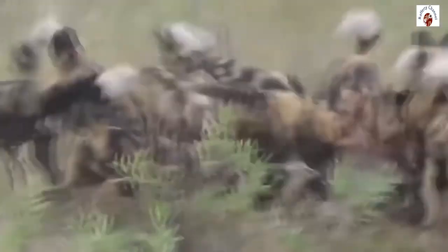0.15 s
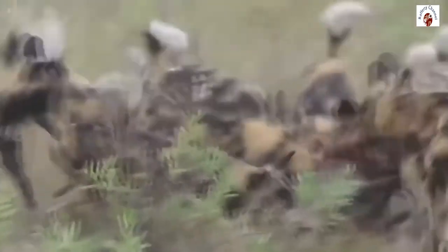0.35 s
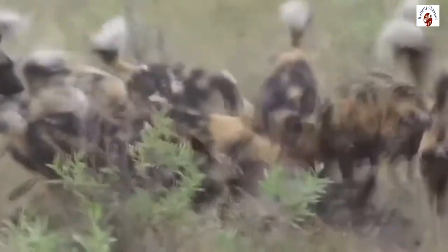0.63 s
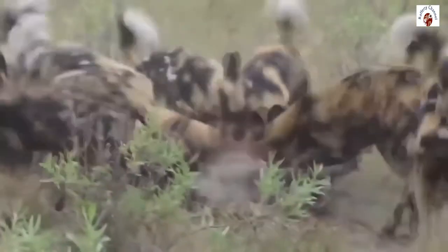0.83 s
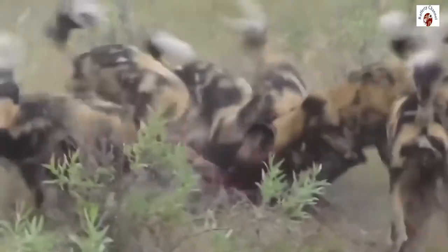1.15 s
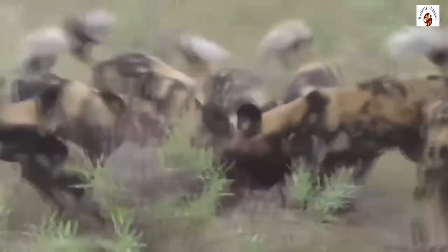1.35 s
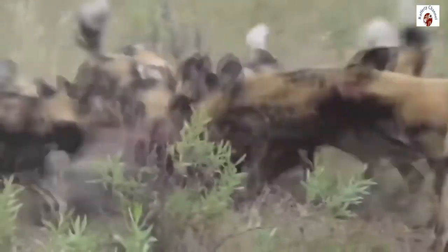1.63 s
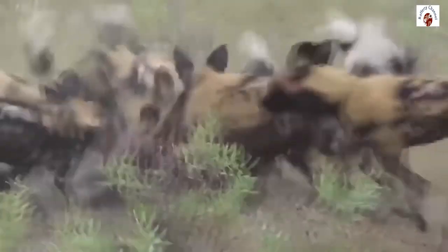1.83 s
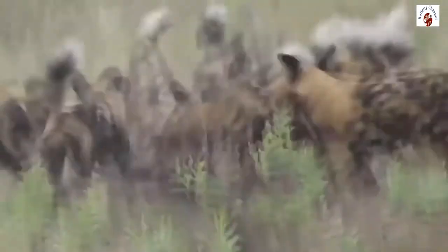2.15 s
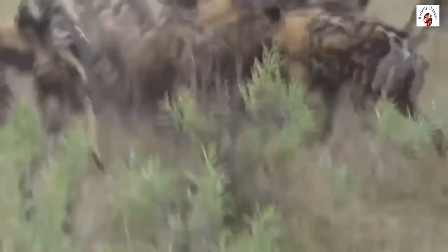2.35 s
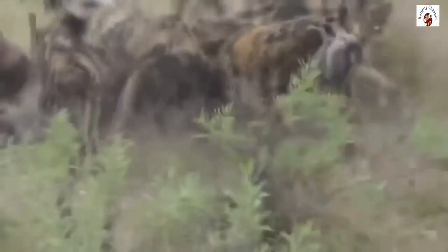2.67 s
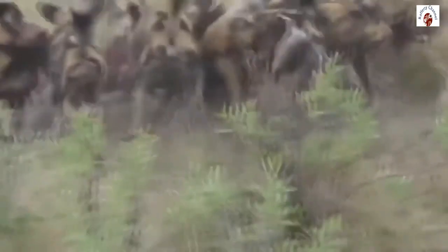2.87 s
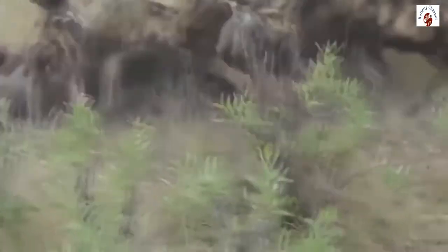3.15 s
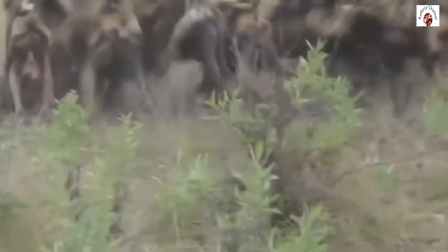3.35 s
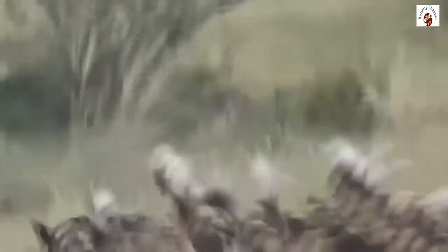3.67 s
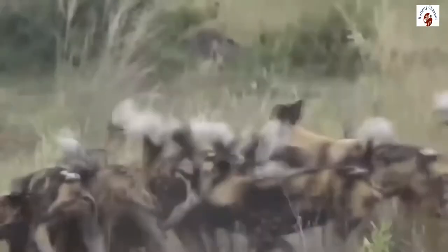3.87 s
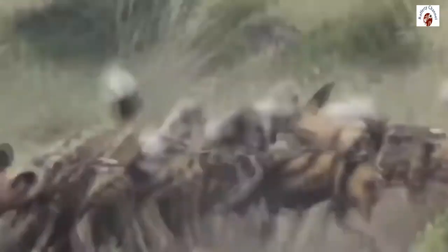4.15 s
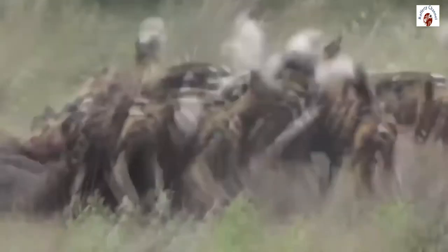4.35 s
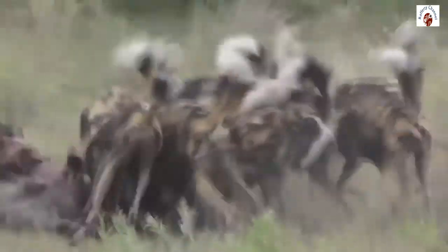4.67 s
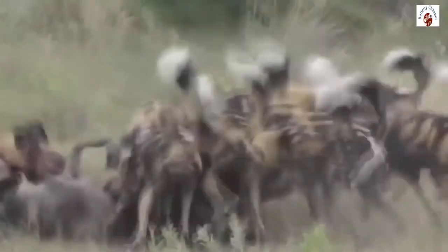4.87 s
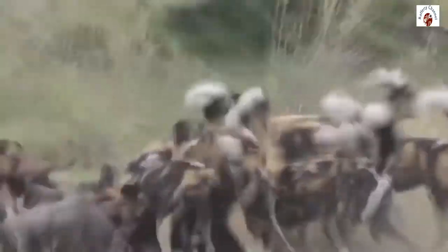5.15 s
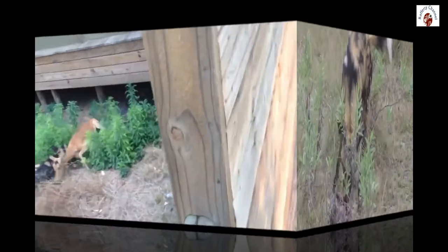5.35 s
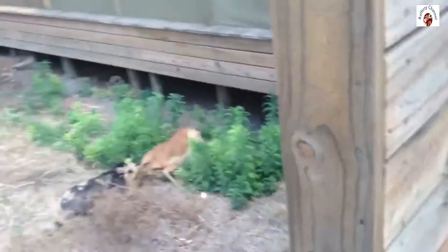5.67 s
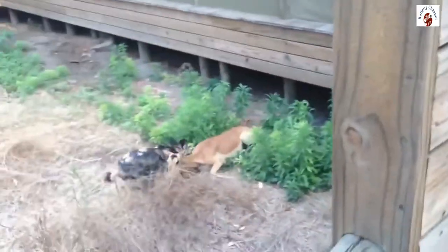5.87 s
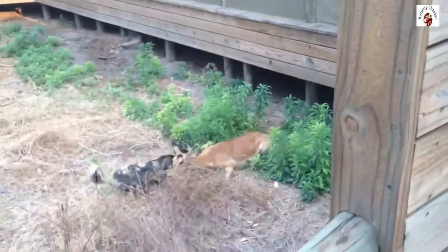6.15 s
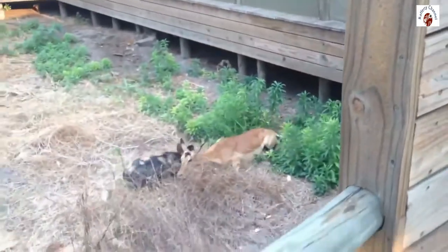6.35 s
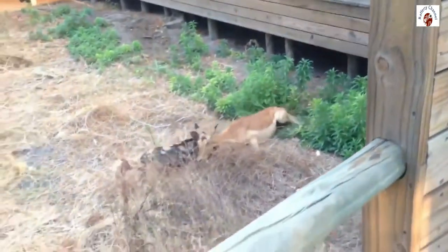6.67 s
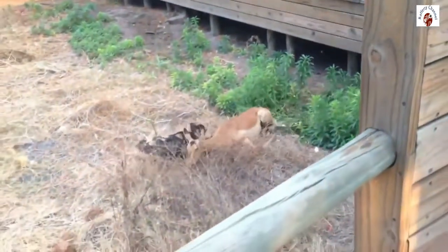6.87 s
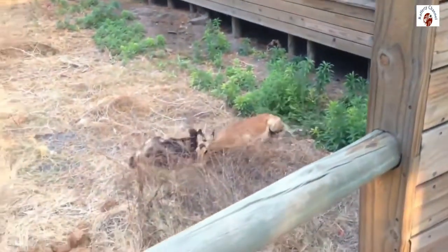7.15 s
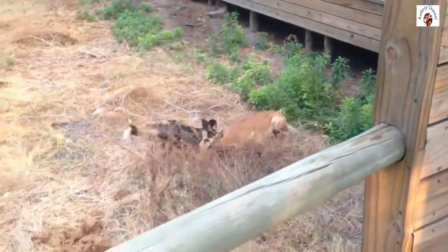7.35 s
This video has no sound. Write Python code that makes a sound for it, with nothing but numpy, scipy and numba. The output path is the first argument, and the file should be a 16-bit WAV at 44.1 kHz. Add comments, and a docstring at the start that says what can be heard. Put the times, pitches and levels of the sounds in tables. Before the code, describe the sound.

A distant, faint outdoor scene opens with shrill insect hiss, rumbling air at the microphone, a piping bird, then thin gliding dog squeaks and one weak whine. Suddenly the sound becomes near, loud and centred: rough, throaty antelope cries with a slight hollow wall reflection, while struggling legs crunch dry stalks with sharp snaps and soft thuds. The last cry is cut short at its start.

```python
"""Grassland: a pack of wild dogs twitters faintly under a cicada, a bird repeating one whistle and wind on two ports.
Dogs and bird are gliding near-sines, a faint whine is noise through a mouth, the cicada is a set of steady lines.
Then the scene changes to a closer, mono one beside a wooden wall: a seized antelope bellows hoarsely, made of
uneven pulses ringing a throat, while legs thrash through dry grass, made of noise, snaps and dull thuds."""
import sys
import numpy as np
from scipy import signal
from scipy.fft import rfft, irfft, next_fast_len
from scipy.io import wavfile
from scipy.ndimage import uniform_filter1d
from numba import njit

SR = 44100
rng = np.random.default_rng(int(sys.argv[2]) if len(sys.argv) > 2 else 0)


def unload_audio(sound):
    """Save the sound as a 16-bit wav file, at the path given as the first command line argument."""
    columns = np.transpose(np.atleast_2d(sound))
    # keep every value between -1 and 1, then stretch to whole-number steps
    steps = np.round(np.clip(columns, -1, 1) * 32767)
    wavfile.write(sys.argv[1], SR, steps.astype(np.int16))


N = 331191
T = np.arange(N) / SR
CHANGE_S = 5.303  # when the closer scene begins

# sudden pushes of air in the bellows, each starting a pair of closures: (time [s], push [dB])
SURGE_ROWS = [(5.449, 10), (5.472, 6), (5.514, 3), (5.538, 2), (5.573, 3), (5.656, 6), (5.679, 3.5),
              (5.7, 1), (5.72, 1), (5.756, 7), (6.424, 6), (6.644, 9), (6.677, 4), (6.746, 6), (6.76, 2),
              (6.797, 3), (6.821, 4), (6.847, 3), (6.881, 5), (7.494, 2)]


def undb(db):
    """Turn decibels into a plain factor."""
    return 10 ** (np.asarray(db) / 20)


def unit(x):
    """Scale to an rms of 1."""
    return x / np.sqrt(np.mean(x ** 2))


def curve(rows, column, outside=None):
    """Draw one column of a table along the whole time axis."""
    rows = np.array(rows)
    return np.interp(T, rows[:, 0], rows[:, column], outside, outside)


def walk(rate):
    """Random levels, held for 1 / rate seconds and smoothed twice; spread near 1."""
    hold = int(SR / rate)
    steps = np.repeat(rng.standard_normal(N // hold + 1), hold)
    return unit(uniform_filter1d(uniform_filter1d(steps, hold), hold)[:N])


@njit
def svf(x, hz, width):
    """State-variable band-pass filter with a moving centre, where its gain is 1."""
    y, b, l = np.empty(len(x)), 0., 0.
    for i in range(len(x)):
        g, k = np.tan(np.pi * hz[i] / SR), width / hz[i]
        v = (b + g * (x[i] + 1e-18 - l)) / (1 + g * (g + k))
        b, l, y[i] = 2 * v - b, l + 2 * g * v, k * v
    return y


def band(x, hz, width):
    """The same band-pass, for a fixed or moving centre."""
    return svf(x, hz * np.ones(len(x)), float(width))


def band_twice(x, hz, width):
    """Two equal band-passes in a row, for steeper sides."""
    return band(band(x, hz, width), hz, width)


def coloured(points, x):
    """Shape the spectrum of x by (frequency [Hz], level [dB]) points, then scale to rms 1."""
    hz, db = np.transpose(points)
    f = np.arange(1, N // 2 + 2) * SR / N
    return unit(irfft(rfft(x) * undb(np.interp(np.log(f), np.log(hz), db)), N))


def air():
    """Distant rustle of the plain, wind buffeting the ports, and slow pressure pushes that both ports share."""
    # colour of the rustle: (frequency [Hz], relative level [dB per Hz])
    field_colour = [(20, -8), (120, -25), (250, -25), (500, -28.5), (1000, -34.5), (2500, -42), (5600, -46),
                    (6500, -40), (8500, -39), (9300, -40.5), (10500, -48.5), (12300, -58), (13000, -75),
                    (16000, -85)]
    # gusts and lulls: (time [s], change of wind level [dB], fading time [s])
    gust_rows = [(.0, 4, .04), (.12, -5, 0.066), (1.95, 9.5, 0.15), (2.88, 2, 0.14), (3.4, 4.5, 0.06),
                 (3.95, 5.5, 0.096), (4.21, 7, 0.095), (4.5, 5, 0.044), (4.82, 9, 0.12)]
    # pushes: (time [s], peak before the leak [dB], length scale [s])
    push_rows = [(0.057, -42.5, 0.037), (0.616, -45, 0.036), (1.192, -43.5, 0.06), (1.718, -48, 0.022),
                 (2.294, -43.5, 0.031), (2.843, -46, 0.032), (3.4, -44.5, 0.033), (3.975, -43, 0.051),
                 (4.544, -41.5, 0.056), (4.878, -47, 0.067), (5.086, -40.5, 0.04)]
    field_db, wind_db = -62, -65
    field = np.array([coloured(field_colour, rng.standard_normal(N)) * undb(field_db + 1.16 * walk(23.17))
                      for _ in range(2)])

    coarse = T[::16]  # slow shapes need fewer points
    gusts = 0
    for s, db, fade in gust_rows:
        hurry = np.where(coarse > s, 1, 3.0)  # rises three times as fast as it fades
        gusts = gusts + db * np.exp(-hurry * np.abs(coarse - s) / fade)
    gusts = np.interp(T, coarse, gusts)
    shared, left, right = (unit(band_twice(rng.standard_normal(N), 69, 100)) for _ in range(3))
    wind = (0.67 * shared + 0.7 * np.array([left, right])) * undb(wind_db + gusts + 2.0 * walk(25.25))

    pushes = sum(undb(db) * np.exp(-np.abs((coarse - s) / (0.66 * length)) ** 5.4)
                 for s, db, length in push_rows)
    pushes = np.interp(T, coarse, pushes)
    slack = signal.lfilter([1 / 9000], [1, 1 / 9000 - 1], pushes)  # the ports leak, so pressure settles back
    return field + wind + pushes - slack


def verse(t, first, clicks, strokes, second, level, size=32):
    """Click partials with side lines a stroke rate apart; each line flutters alone, differently at each port."""
    # side lines of a click partial, from one below it upwards: (level against the partial [dB])
    stroke_side = (-9, 0, -7, -1, -6, -13)
    # lines of the second insect, from three below its named line: (level against its table level [dB])
    second_side = (-6.5, -9, -12, -2, -18)
    rasp_db, rasp_hz = -13, 200  # level against the partials, and width
    lines = [(first + n * clicks + j * strokes, db + side)
             for n, db in enumerate(level[:-1]) for j, side in enumerate(stroke_side, -1)]
    lines += [(second + j * strokes, level[-1] + side) for j, side in enumerate(second_side, -3)]
    hz, db = np.transpose(lines)[:, :, None]

    # flutter: new random level and phase about 14 times a second, one value per block of samples
    count = int((t[-1] - t[0]) * 14) + 2
    chance = rng.standard_normal((2, 2, len(lines), count))
    at = np.linspace(0, count - 1, len(t) // size)
    swell, turn = np.apply_along_axis(lambda k: np.interp(at, np.arange(count), k), -1, chance)
    gain = np.sqrt(2) * undb(db + 3 * swell)
    late = 2 * np.pi * (.12 * turn + rng.random((2, len(lines), 1)))
    phase = (2 * np.pi * (hz * t[:len(at) * size] % 1)).astype(np.float32).reshape(len(lines), -1, size)
    # sum of gain * sin(phase + late), by the sine addition rule; p = port, l = line, b = block, s = sample
    song = sum(np.einsum("plb,lbs->pbs", (gain * a(late)).astype(np.float32), b(phase))
               for a, b in ((np.cos, np.sin), (np.sin, np.cos)))
    song = np.pad(song.reshape(2, -1), ((0, 0), (0, len(t) % size)))

    # unsteady clicks spread a hiss around each partial
    n = next_fast_len(len(t), True)
    f = np.arange(n // 2 + 1) * SR / n
    comb = 0
    for k, partial_db in enumerate(level[:-1]):
        centre = first + k * clicks + 0.77 * strokes
        comb = comb + undb(partial_db) / (1 + ((f - centre) / (rasp_hz / 2)) ** 4)
    rasp = irfft(rfft(rng.standard_normal((2, n))) * comb, n)[:, :len(t)] * np.sqrt(2 * SR / np.pi / rasp_hz)
    return song + undb(rasp_db) * rasp


def cicada():
    """Verses blend into each other and waver a little in pitch; faint overtones flicker above."""
    # verses: (start [s], end [s], blend [s], lowest click partial [Hz], clicks [per s], strokes [per s],
    # line of a second insect [Hz])
    verse_rows = [(0, 1.9, .8, 6327, 354.3, 48.5, 6190), (1.1, 4.51, .8, 6340, 355.2, 50.5, 6185),
                  (4.505, 5.1, .005, 6408, 357, 51, 6206), (4.95, 5.4, .15, 6408, 357, 51, 6206)]
    # per verse, before flutter and port balance: (eight click partials [dB rms], second insect [dB])
    verse_levels = [(-100, -78, -84, -73, -78.5, -72, -86, -83, -78.5),
                    (-100, -76, -78.5, -75.5, -76, -74, -80, -80.5, -80),
                    (-83, -73.5, -81, -73.5, -82, -74.5, -83, -82.5, -83),
                    (-92, -76, -77, -74, -92, -67, -90, -89, -81)]
    # overtones, before flicker and port balance: (frequency [Hz], width [Hz], level [dB rms])
    overtone_rows = [(9250, 120, -99), (9760, 170, -111), (11980, 180, -93.5)]
    out = np.zeros((2, N))
    drift = np.cumsum(1 + .0004 * walk(6)) / SR  # a clock that runs slightly unevenly
    for k, ((t0, t1, blend, *song), level) in enumerate(zip(verse_rows, verse_levels)):
        a, b = int(t0 * SR), int(t1 * SR)
        next_blend = verse_rows[min(k + 1, len(verse_rows) - 1)][2]
        rise = np.clip((T[a:b] - t0) / blend, 0, 1) if k else 1
        fall = np.clip((t1 - T[a:b]) / next_blend, 0, 1)
        out[:, a:b] += np.sqrt(rise * fall) * verse(drift[a:b], *song, level)
    for hz, width, db in overtone_rows:
        out += [unit(band(rng.standard_normal(N), hz, width)) * undb(db + 5.0 * walk(4.96)) for _ in range(2)]
    return out * undb([[-1.5], [1.5]])  # stronger in the second port


def whistle(rows, edge_s, rough_db):
    """A near sine with soft ends and breathy shimmer, reaching the two ports in different phase."""
    s, hz, db = np.transpose(rows)
    a = int(s[0] * SR)
    t = T[a:int(s[-1] * SR)]
    ends = np.clip(np.minimum(t - t[0], t[-1] - t) / edge_s, 0, 1)
    phase = 2 * np.pi * (np.cumsum(np.interp(t, s, hz)) / SR + rng.random())
    shimmer = uniform_filter1d(rng.standard_normal((2, SR // 4)), size=400)[:, :len(t)] * 20  # spread near 1
    phase = phase + 0.12 * rough_db * shimmer[::-1]  # breath blurs the pitch too
    level_db = uniform_filter1d(uniform_filter1d(np.interp(t, s, db), size=180), size=180)
    tone = np.sin(phase + [[0], [1.3]])
    out = np.zeros((2, N))
    out[:, a:a + len(t)] = np.sqrt(2) * undb(level_db + rough_db * shimmer) * ends * tone
    return out


def bird():
    """One falling note that swells and breaks off, repeated over a blur of its scattered echoes."""
    # notes: (central moment [s], reference level [dB], reference pitch [Hz], stretch in time [factor])
    bird_rows = [(0.297, -57, 4040, 1.06), (0.628, -58, 4030, 0.91), (.945, -57, 3996, 1.03),
                 (1.264, -53.5, 4020, 0.98), (1.586, -53, 4025, 1.01), (1.932, -57, 4000, 0.93)]
    # shape of a note, before stretch and random scaling of the pitch offset:
    # (time from the central moment [s], offset from the pitch [Hz], level against the reference [dB])
    note_shape = [(-.058, 125, -24), (-.04, 55, -13), (-.02, 15, -3.5), (-.004, 14, 3), (.003, -32, 9),
                  (.009, -80, -5), (.018, -93, -3), (.027, -40, -21)]
    note_before = (-.03, -55)  # a note just gone, whose echoes still sound (s, dB)
    blur_db, blur_db_per_s = -21.5, 36  # echoes: level against the note, and fading
    notes = 0
    for s, db, hz, stretch in bird_rows:
        scaled = np.array(note_shape) * [stretch, 1 + .15 * rng.standard_normal(), 1]
        notes = notes + whistle(scaled + [s, hz, db], 0.005, 1.5)
    fade = sum(undb(db + blur_db - blur_db_per_s * np.clip(T - s, 0, 2)) * (T > s)
               for s, db, *_ in bird_rows + [note_before])
    blur = [unit(band_twice(rng.standard_normal(N), 4050, 240)) * undb(3.0 * walk(20)) for _ in range(2)]
    return notes + blur * fade


def far_twitters():
    """Dogs further off call at random moments; rows like those in twitters()."""
    calls, lowest_db = 24, -88
    s, length, hz, glide, db = rng.random((calls, 5)).T
    hz = 1900 + 2200 * hz
    last_hz = hz * (.85 + .2 * glide)
    return list(zip(5.1 * s, .04 + .06 * length, hz, last_hz, 1 + glide, lowest_db + 5 * db, 0 * s))


def twitters():
    """Each dog call glides from its first pitch to its last, dips mid-way, and is smeared by bushes."""
    # calls: (start [s], length [s], first pitch [Hz], last pitch [Hz], bend [over 1: the glide comes late],
    # level before the dip [dB], swell from start to end [dB])
    twitter_rows = [(0.072, .15, 2350, 2420, 1.3, -80, -3), (0.318, 0.09, 1370, 1270, 1.2, -77, -4),
                    (1.412, 0.05, 3400, 3380, 0.98, -71, 2), (1.45, .07, 2760, 2680, 1.3, -80, 4),
                    (1.52, .055, 2520, 2450, 1, -77, 0), (.62, .08, 1950, 1880, 1, -80, 0),
                    (.97, .09, 2450, 2540, 1, -80, 0), (4.03, .04, 1720, 1660, 1, -79, 0),
                    (4.46, .05, 1730, 1680, 1, -80, 0), (1.989, 0.061, 2350, 2310, 0.99, -76, 2),
                    (2.05, 0.071, 2290, 1880, 1.2, -79, 2), (2.04, .03, 2050, 1980, 1, -77, 0),
                    (2.185, .03, 4180, 4020, 1, -78, 0), (2.49, .04, 4130, 4080, 1, -78, 0),
                    (2.222, 0.03, 2750, 2400, 1.2, -76, 2), (2.235, .03, 2150, 1900, 1, -79, 0),
                    (2.396, 0.04, 3120, 2960, 1.3, -76, 1), (2.425, 0.095, 2760, 2550, .8, -78, -3),
                    (2.47, .13, 2330, 2000, 0.94, -76.5, -7), (3.133, 0.14, 4760, 3600, 0.54, -78, -3),
                    (3.404, .07, 3230, 3030, 5.1, -70, -4), (3.555, .035, 4070, 3850, 1.9, -69, 3),
                    (3.588, .04, 3600, 2600, .8, -79, -4), (3.408, .02, 4000, 3950, 1, -76, 0),
                    (3.693, 0.18, 3370, 3630, 0.32, -77.5, -11), (3.74, 0.067, 3000, 3010, 1.1, -76, 3),
                    (3.886, 0.1, 3200, 2310, 2.3, -73, 2), (4.023, .05, 2500, 2700, 1, -77, 1),
                    (4.772, 0.035, 2950, 3000, 1.1, -84, 0), (4.095, 0.082, 3150, 2930, 2.7, -76, -8),
                    (4.269, .055, 2800, 2430, 1.3, -73, 7.5), (4.53, 0.058, 3800, 3820, 1.1, -79, 5),
                    (4.72, 0.079, 3460, 3580, 1, -80, -11), (4.86, 0.086, 3150, 2630, 1.6, -79, -3),
                    (5.025, 0.09, 2430, 3400, 2.2, -76, 5), (5.215, 0.088, 3000, 2600, 2, -75, 0)]
    middle_db = -3  # change of level in the middle of a call
    smear_db, smear_t60_s = -6, 0.37  # level against the call, time to fade by 60 dB
    u = np.linspace(0, 1, num=9)
    dry_calls = 0
    for s, length, first_hz, last_hz, bend, db, swell in twitter_rows + far_twitters():
        hz = first_hz + (last_hz - first_hz) * u ** max(bend, .2)
        level_db = db + swell * (u - .5) + middle_db * np.sin(np.pi * u)
        dry_calls = dry_calls + whistle(np.transpose([s + length * u, hz, level_db]), 0.012, 3.5)
    tail = rng.standard_normal((2, SR // 4)) * undb(-60 * T[:SR // 4] / smear_t60_s)
    tail = tail / np.sqrt(np.sum(tail ** 2, axis=1, keepdims=True))
    return dry_calls + undb(smear_db) * signal.fftconvolve(dry_calls, tail, axes=1)[:, :N]


def whine():
    """A faint hoarse whine in the pack: breathy noise through mouth resonances that shift and flicker."""
    # loudness: (time [s], level [dB])
    whine_rows = [(3.2, -81), (3.3, -64), (3.4, -67), (3.52, -69), (3.65, -78)]
    # mouth: (resonance before the shift [Hz], width [Hz], weight before flicker and levelling [dB])
    mouth_rows = [(450, 150, -1), (1140, 400, 0), (1610, 240, 1), (1880, 260, 0), (2250, 500, -9)]
    # the mouth opens: (time [s], factor on the resonances)
    opening_rows = [(3.2, .92), (3.36, 1.06), (3.6, 1.0)]
    noise = rng.standard_normal((2, N))
    shift = curve(opening_rows, 1)
    mouth = 0
    for hz, width, db in mouth_rows:
        ring = np.array([band_twice(x, hz * shift, width) for x in noise])
        mouth = mouth + undb(db + 3.1 * walk(30)) * ring
    return unit(mouth) * undb(curve(whine_rows, 1, -200))


def knocks(events, cycles, rise):
    """Short damped rings that last a few cycles and take a share of a cycle to rise."""
    out = np.zeros(N)
    for s, db, hz in events:
        a = int(s * SR)
        turns = hz * np.arange(min(int(.08 * SR), N - a)) / SR
        shape = (1 - np.exp(-turns / rise)) * np.exp(-turns / cycles)
        out[a:][:len(turns)] += undb(db) * shape * np.sin(2 * np.pi * turns)
    return out


def thuds():
    """Hooves and paws: a dull ring with a short scuff of earth."""
    # hits: (time [s], strength before rise and damping [dB], ring [Hz])
    thud_rows = [(5.413, -36, 292), (5.436, -41, 330), (5.945, -41, 290), (5.968, -41.5, 239.5),
                 (6.007, -38.5, 480), (6.018, -43.5, 270), (7.064, -33.5, 296), (7.074, -38, 680),
                 (7.094, -39, 448), (7.107, -44, 259), (7.146, -37, 170), (7.163, -39, 332),
                 (7.22, -43, 350), (7.246, -40, 720), (7.272, -45, 760)]
    hits = sum(undb(db) * np.exp(-np.clip(T - s, 0, 1) / 0.02) * (T > s) for s, db, _ in thud_rows)
    scuff = unit(band_twice(rng.standard_normal(N), 370, 450)) * hits * undb(-13.5)
    return knocks(thud_rows, cycles=2.37, rise=0.54) + scuff


def grass():
    """Dense grains of breaking stalks over a duller rustle, single snaps, thuds and the microphone's hiss."""
    # steady rustle, before flicker or the dull layer's boost: (time [s], level [dB])
    rustle_rows = [(5.3, -61), (5.41, -64), (5.57, -47.5), (5.85, -53), (6.03, -55), (6.3, -62),
                   (6.45, -52), (6.86, -52.5), (7.3, -58), (7.51, -55.5)]
    # colour of the dull layer: (frequency [Hz], relative level [dB per Hz])
    dull_colour = [(35, -73), (60, -43), (112, -2), (135, 1), (187, 5), (319, 3.5), (582, 0.5), (863, -1),
                   (2750, -3), (4480, -13.5), (10300, -27), (13600, -14), (15300, -13.5)]
    # legs sweeping the stalks: (time [s], peak [dB], half width [s])
    sweep_rows = [(5.41, -59.5, 0.11), (5.579, -66, 0.021), (6.039, -55, 0.22), (6.377, -51.5, 0.044),
                  (6.756, -49, 0.0071), (6.79, -59, 0.023), (5.934, -62, 0.0043), (7.105, -59, 0.01),
                  (7.21, -62, .03), (7.27, -56, 0.025)]
    # snapping stalks: (time [s], strength before rise and damping [dB], ring [Hz])
    snap_rows = [(5.3914, -39, 6300), (5.404, -37, 7100), (5.412, -40, 6900), (5.4244, -38, 5400),
                 (5.516, -46, 5740), (5.932, -40, 4650), (6.429, -28.5, 4400), (6.6676, -43, 5900),
                 (6.6908, -33.5, 6250), (6.7551, -59, 3998), (6.7551, -49, 5760), (6.789, -28.5, 6960),
                 (7.2695, -49, 4380)]
    dull_db = 3.5  # dull layer against the rustle level
    hiss_db, hiss_hz, sweep_top_db = -66.5, 12500, -22  # the last: share of a sweep in the top octave
    grains = rng.standard_normal(N) * undb(2.6 * uniform_filter1d(rng.exponential(size=N), size=30) * 4.2)
    coarse = T[::16]
    sweeps = sum(undb(db) * np.exp(-((coarse - s) / half) ** 2) for s, db, half in sweep_rows)
    sweeps = np.interp(T, coarse, sweeps)
    rustle_db = curve(rustle_rows, 1)
    crisp = unit(band(grains, 5250, 3940)) * (undb(rustle_db + 1.0 * walk(25)) + sweeps)
    dull = coloured(dull_colour, rng.standard_normal(N)) * undb(rustle_db + dull_db)
    hiss_level = undb(hiss_db + 1.2 * walk(7.7)) + undb(sweep_top_db) * sweeps
    hiss = unit(band(rng.standard_normal(N), hiss_hz, 5500)) * hiss_level
    return crisp + dull + hiss + knocks(snap_rows, cycles=3.2, rise=.05) + thuds()


def pulses():
    """Vocal folds close in pairs, the second one early; periods and sizes scatter; a surge starts a new pair."""
    # folds, before pairing and scatter: (time [s], rate [pulses per s], period scatter [0-1])
    fold_rows = [(5.4, 190, .15), (5.6, 180, .22), (5.96, 170, .25), (6.39, 154, .02), (6.5, 160, .02),
                 (6.55, 145, .03), (6.59, 138, .03), (6.63, 146, .05), (6.7, 160, .16), (7.51, 150, .2)]
    second_db, early, early_per_scatter = -1, .33, -.5  # second pulse of a pair; even pairs limp most
    out, s, second = np.zeros(N + 1), fold_rows[0][0], 1
    time, rate, scatter = np.transpose(fold_rows)
    surges = np.array(SURGE_ROWS)[:, 0]
    for late, size in rng.standard_normal((600, 2)):
        rough = np.interp(s, time, scatter)
        limp = 1 + (2 * second - 1) * (early + early_per_scatter * rough)
        step = np.exp(rough * np.clip(late, -1.5, 2)) * limp / np.interp(s, time, rate)
        ahead = surges[(surges > s) & (surges < s + step + .006)]
        s, second = (ahead[0], 0) if len(ahead) else (s + step, 1 - second)
        at = s * SR
        if at >= N - 1:
            break
        gain = undb(second_db * second + (2 + 6 * rough) * np.tanh(size) * (s not in surges))
        # split between two samples, so the timing is finer than one sample
        out[int(at)] += gain * (1 - at % 1)
        out[int(at) + 1] += gain * (at % 1)
    return out[:N]


def wall_answer(voice):
    """Blurred, slightly hollow answer of the wall and the space under the deck: fading noise as an echo."""
    wall_db, wall_t60_s, wall_hz = -17, .3, 480
    t = T[:SR // 4]
    echo = rng.standard_normal(len(t)) * undb(-60 * t / wall_t60_s) * (t > .008)
    echo = unit(echo) + .7 * unit(band(echo, wall_hz, 300))
    return undb(wall_db) * signal.fftconvolve(voice, echo / np.sqrt(np.sum(echo ** 2)))[:N]


def antelope():
    """Uneven pulses and the air that rasps after each one ring the throat; the wall answers."""
    # one table per bellow, levels before a last trim: (time [s], level [dB], lower, upper and top moving
    # throat resonance [Hz])
    bellow_rows = [
        [(5.42, -92, 500, 1090, 2700), (5.444, -49, 523, 1080, 2700), (5.449, -50, 517, 1110, 2670),
         (5.494, -32, 574, 1130, 2640), (5.55, -28, 493, 1280, 2780), (5.694, -23.5, 448, 1106, 2600),
         (5.802, -29.5, 413, 1093, 2570), (5.845, -50, 449, 1040, 2530), (5.9, -75, 445.7, 1080, 2400)],
        [(6.394, -59, 470, 1222, 2700), (6.416, -32.5, 539.4, 1226, 2720), (6.488, -27, 523, 1155, 2820),
         (6.516, -28.5, 530, 1180, 2810), (6.612, -27.5, 500, 1084, 2630), (6.7, -28.5, 498, 1090, 2440),
         (6.81, -26, 486, 1128, 2470), (6.94, -28, 500, 1150, 2490), (6.957, -35, 505, 1176, 2600),
         (7.0, -49, 473.6, 1140, 2539)],
        [(7.468, -69, 472, 1120, 2620), (7.48, -41.5, 500, 1130, 2600), (7.51, -25, 490, 1190, 2610)],
    ]
    # chest, then nose, before the sway: (resonance [Hz], width [Hz])
    chest_nose_rows = [(245, 184), (740, 580)]
    # third throat resonance, before the sway: (time [s], frequency [Hz])
    third_rows = [(5.45, 1820), (5.6, 1930), (5.7, 1800), (5.82, 1720), (6.42, 1950), (6.6, 1870),
                  (6.66, 1860), (6.75, 1985), (6.9, 1850), (7.51, 1880)]
    # per bellow, against the level: (lower moving resonance, chest, nose, third, top [dB])
    colour_rows = [(-4, -13, -0.5, -9, -13.5), (-16.5, -9.5, -4, -7.5, -20.5), (-4.5, -9, -6, -17, -19)]
    # the nose closes and the throat deepens as a bellow goes on: (same five columns [dB per s])
    colour_drift = [(6, 0.0016, -79, -6, -33), (15.5, 0.0048, -22.5, -12, 17), (0, 0, 0, 0, 0)]
    # weaker resonances, before the sway and the offset per bellow: (frequency [Hz], width [Hz], level [dB])
    weak_rows = [(1513, 296, -13), (2280, 174, -19)]
    # offset of the weaker resonances: (one per bellow [dB])
    weak_offset = (2, -2, -1)
    # under full voice the other resonances fall less (dB per dB, same five columns)
    soft_db_per_db, full_db = (0.031, 0.52, 0.18, 0.42, 0.071), -26.5
    # time the mouth takes to open in each bellow (s), change of the five resonances while shut (dB)
    open_s, shut_db = (0.045, 0.02, .02), (6, 0, 3, -25, -40)
    catch, catch_s, push_s = .45, .01, .022  # breath catches before a surge (share of its dB, time), push fades
    flicker_db = 2.2  # each main resonance swells and sinks on its own

    a = int(CHANGE_S * SR)
    t = T[a:]
    closure = pulses()
    rasp = signal.lfilter([1], [1, -np.exp(-1 / (0.005 * SR))], closure) * rng.standard_normal(N)
    source = (closure + .034 * rasp)[a:]
    surge_db = 0
    for s, db in SURGE_ROWS:
        away = np.abs(t - s)
        surge_db = surge_db + db * np.where(t > s, np.exp(-away / push_s), -catch * np.exp(-away / catch_s))
    source *= undb(surge_db)

    all_rows = np.vstack(bellow_rows)
    level_db, low_hz, high_hz, top_hz = (curve(all_rows, c)[a:] for c in range(1, 5))
    starts = np.array([rows[0][0] for rows in bellow_rows])
    call = np.clip(np.searchsorted(starts, t) - 1, 0, None)  # which bellow each moment belongs to
    since = t - starts[call]
    share_db = np.array(colour_rows)[call] + np.minimum(since, .6)[:, None] * np.array(colour_drift)[call]
    share_db += np.outer(np.clip(full_db - level_db, 0, 40), soft_db_per_db)
    share_db += np.outer(np.exp(-np.maximum(since, 0) / np.array(open_s)[call]), shut_db)

    sway = 1 + 0.03 * walk(30)[a:]  # the struggle shakes the throat resonances
    third_hz = curve(third_rows, 1)[a:] * sway
    rings = [svf(svf(source, low_hz, 204.0), low_hz, 86.0)]
    rings += [band_twice(source, hz * sway, width) for hz, width in chest_nose_rows]
    rings += [svf(svf(source, third_hz, 300.0), third_hz, 220.0)]
    rings += [svf(svf(source, top_hz, 480.0), top_hz, 186.0)]
    voice = unit(svf(svf(source, high_hz, 370.0), high_hz, 130.0)) * undb(flicker_db * walk(60)[a:])
    for k, (ring, db) in enumerate(zip(rings, share_db.T)):
        sign = (-1) ** (k + 1)  # resonances alternate in sign
        voice = voice + sign * unit(ring) * undb(db + flicker_db * walk(60)[a:])
    for hz, width, db in weak_rows:
        voice = voice + undb(db + np.array(weak_offset)[call]) * unit(band_twice(source, hz * sway, width))

    loudness = sum(undb(curve(rows, 1, -200)) for rows in bellow_rows)
    voice = np.pad(voice, (a, 0)) * loudness * undb(-2.5)
    return voice + wall_answer(voice)


def scene():
    """The open plain in two ports fades out as the close struggle, alike in both, begins."""
    fade_out_s, fade_in_s = .16, .012
    plain = cicada() + twitters() + bird() + whine() + air()
    plain = plain * np.clip(1 - (T - CHANGE_S) / fade_out_s, 0, 1)
    return plain + (antelope() + grass()) * np.clip((T - CHANGE_S) / fade_in_s, 0, 1)


def record(dry):
    """The recorder cuts the top steeply with a low-pass filter."""
    top_hz = 15020
    return signal.sosfilt(signal.ellip(12, .2, 95, top_hz, fs=SR, output="sos"), dry)


dry = scene()
out = record(dry)
unload_audio(out)
```